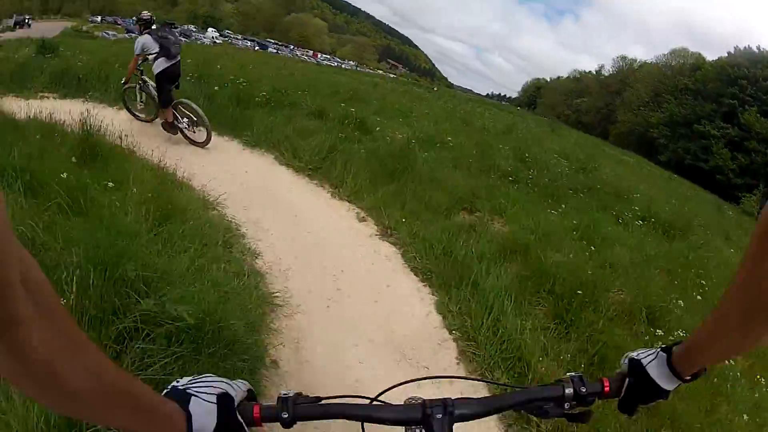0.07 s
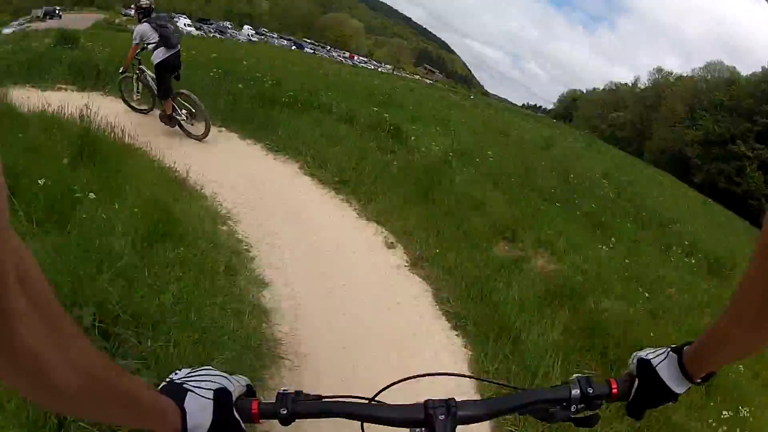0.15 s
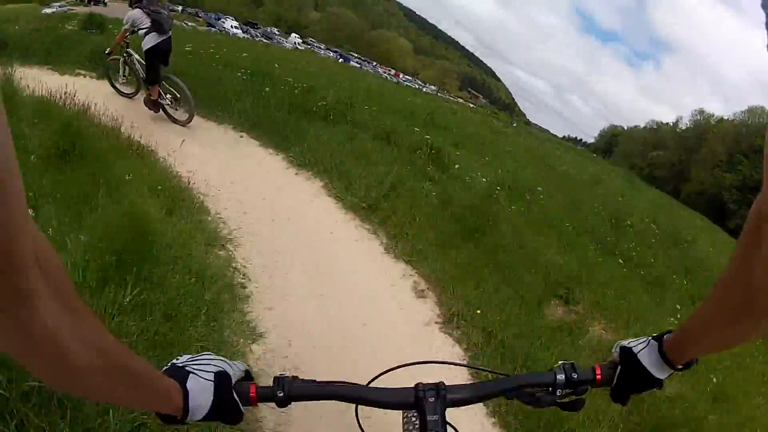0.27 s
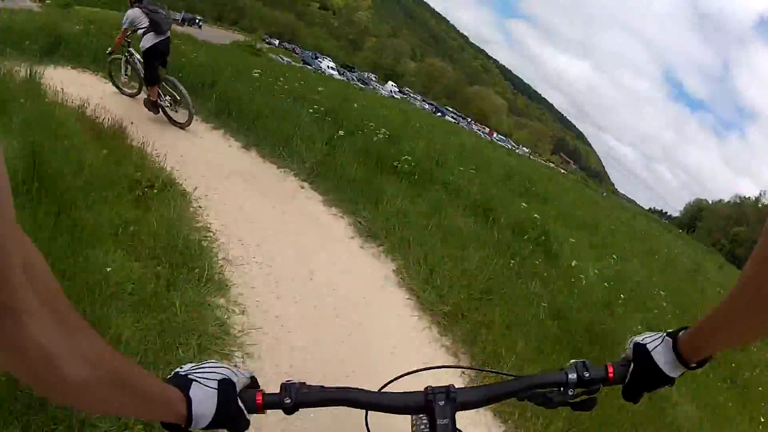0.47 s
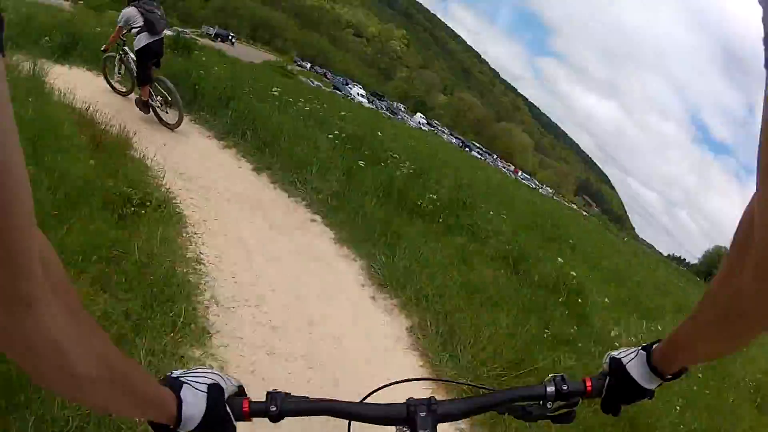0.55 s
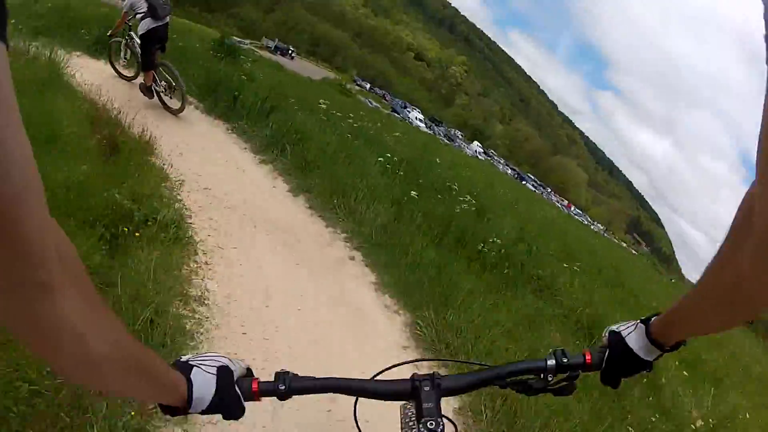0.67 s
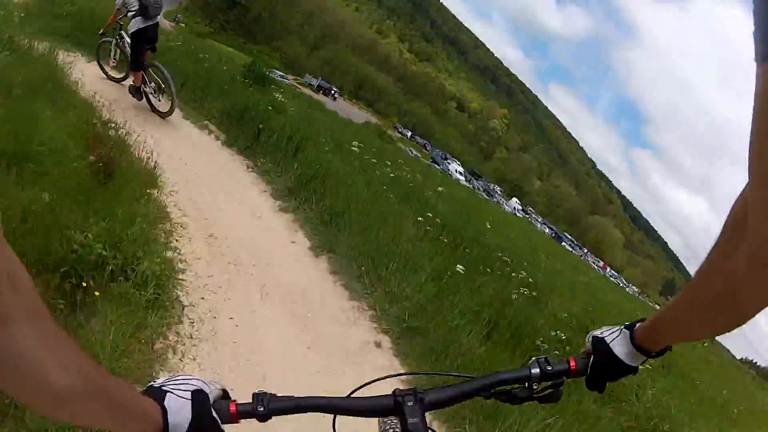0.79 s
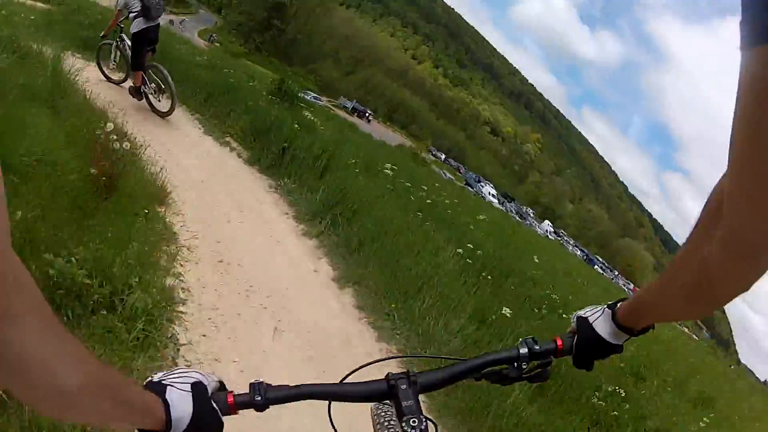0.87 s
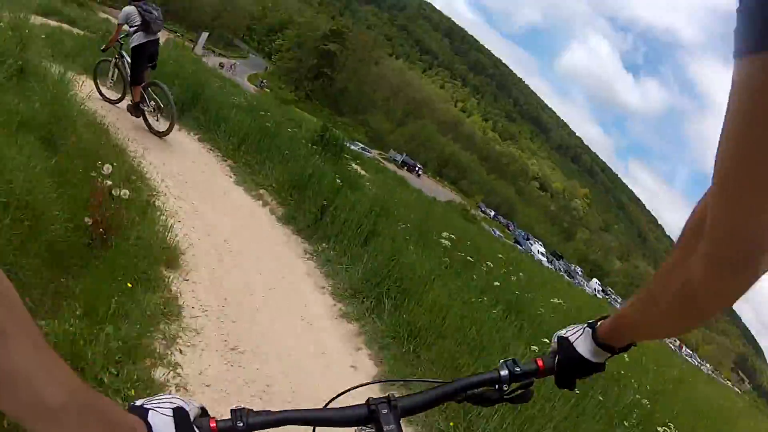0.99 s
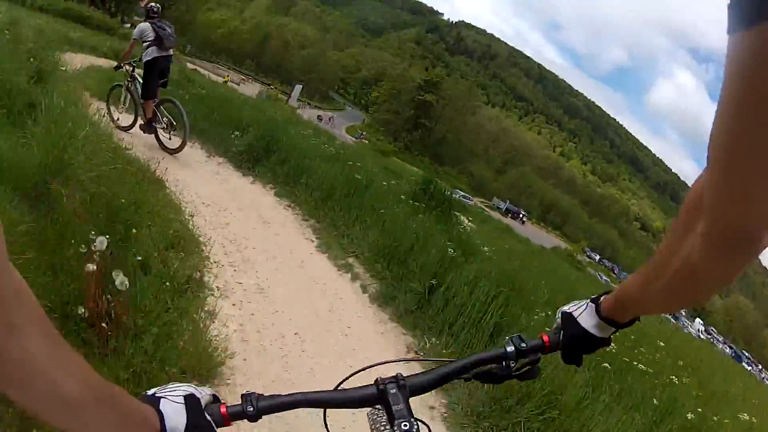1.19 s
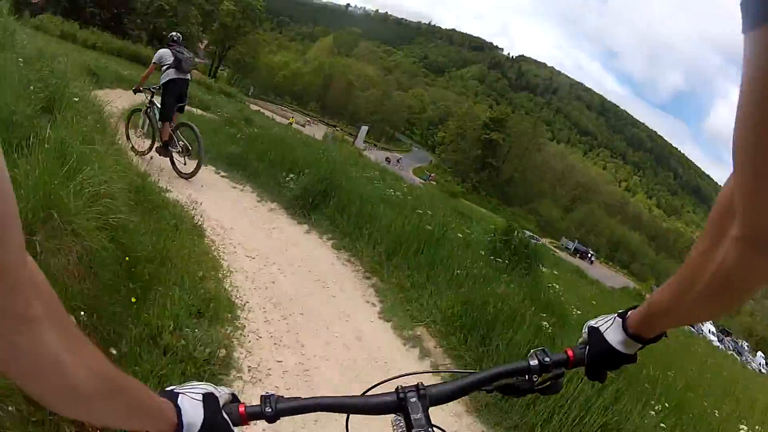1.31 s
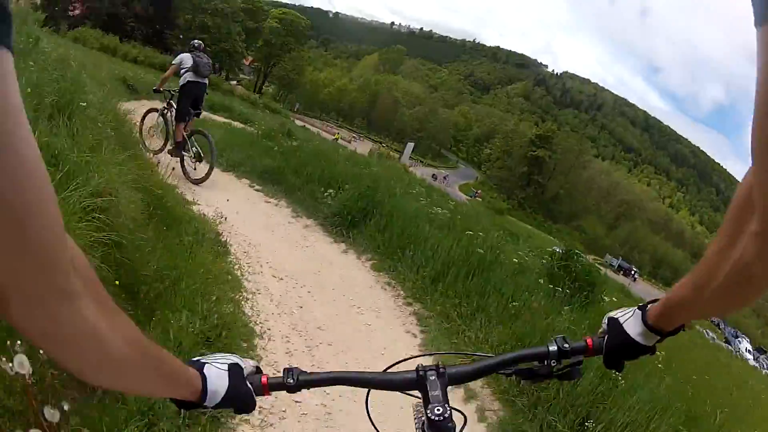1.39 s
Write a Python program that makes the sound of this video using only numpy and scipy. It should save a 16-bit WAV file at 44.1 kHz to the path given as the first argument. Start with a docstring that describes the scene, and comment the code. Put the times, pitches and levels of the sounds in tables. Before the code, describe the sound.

Heard from a microphone on the rider, a mountain bike knocks and ticks irregularly, then clacks harder as it thumps over bumps. Underneath, the tyres rush quietly on the gravel trail and wind rumbles in gusts.

```python
"""A mountain bike rattles along a gravel path, heard from a cased camera on the rider.
Loose parts rap, tick and clack: each blow strikes short resonances and leaves a faint ring in the frame.
Bumps thump through the wheels and frame. The tyres rush over grit and crunch on loose stones.
Wind rumbles on the case."""
import sys
import numpy as np
from scipy import signal
from scipy.fft import rfft, irfft, next_fast_len
from scipy.io import wavfile
from scipy.ndimage import map_coordinates

SR = 44100
rng = np.random.default_rng(int(sys.argv[2]) if len(sys.argv) > 2 else 0)


def digitize_waveform(pressure):
    """Quantize a signal to 16-bit integers and store it at the path in sys.argv[1].

    Rows of a 2-D input are taken as channels; values are limited to [-1, 1].
    """
    field = np.atleast_2d(pressure).T
    bounded = np.clip(field, -1, 1)
    quanta = np.round(bounded * 32767).astype(np.int16)
    wavfile.write(sys.argv[1], SR, quanta)


N = 63945


def amp(db):
    """Decibels to gain."""
    return 10 ** (np.asarray(db) / 20)


def unit_rms(x):
    """Scale to rms 1."""
    return x / np.sqrt(np.mean(x ** 2) + 1e-20)


def envelope(rows):
    """Gain per sample from (t/s, level/dB) rows."""
    return amp(np.interp(np.arange(N) / SR, *np.transpose(rows)))


def wobble(knots_per_s):
    """Smooth random curve, N samples."""
    knots = rng.standard_normal(int(N * knots_per_s / SR) + 4)
    return map_coordinates(knots, [np.arange(N) * knots_per_s / SR])


def filtered(x, response):
    """Apply a complex frequency response."""
    size = 2 * next_fast_len(len(x))
    return irfft(rfft(x, size) * response(np.fft.rfftfreq(size, 1 / SR)), size)[:len(x)]


def coloured(x, spectrum):
    """Minimum-phase filter through (f/Hz, level/dB) rows."""
    def response(f):
        hz, db = np.transpose(spectrum)
        gain = amp(np.interp(np.log(f + 1), np.log(hz + 1), db))
        cepstrum = irfft(np.log(gain))
        half = len(cepstrum) // 2
        cepstrum[1:half] *= 2
        cepstrum[half + 1:] = 0
        return np.exp(rfft(cepstrum))
    return filtered(x, response)


def resonance(f, hz, width_hz):
    """Damped resonance, gain 1 at its centre."""
    return 1j * f * width_hz / (hz * hz - f * f + 1j * f * width_hz)


def add(track, start_s, sound):
    """Mix a sound into the track."""
    part = track[max(0, round(start_s * SR)):][:len(sound)]
    part += sound[:len(part)]


# Rumble spectrum: f/Hz, level/dB
WIND_SPECTRUM = [(12, -9), (25, 9.5), (55, -5.5), (90, -13), (150, -22), (250, -32), (500, -48.5),
                 (1500, -65)]
# Gusts: t/s, level/dB
WIND_LEVEL = [(0, -31.5), (0.1, -46.5), (0.19, -45.5), (0.25, -29.5), (0.31, -42.5), (0.44, -35),
              (0.49, -36.5), (0.58, -35), (0.69, -34.5), (0.82, -28), (0.94, -34), (1.04, -37), (1.17, -32),
              (1.28, -37), (1.33, -47.5), (1.45, -32)]


def wind():
    """Air buffets the camera case."""
    return unit_rms(coloured(rng.standard_normal(N), WIND_SPECTRUM)) * envelope(WIND_LEVEL)


# Stone click spectrum: f/Hz, level/dB
GRIT_SPECTRUM = [(150, -33), (600, -2.5), (1000, 9), (1300, -1.5), (1750, 5), (2700, -0.5), (3700, -11.5),
                 (6000, -23.5), (8500, -22), (10200, -4.5), (12000, -33), (14000, -25), (15600, -29)]


def grit(stones_per_s, spread_db=4):
    """Stones shift under the tread and click at random; rms 1."""
    clicks = (rng.random(N) < stones_per_s / SR) * rng.choice([-1, 1], N)
    strength = amp(spread_db * np.minimum(rng.exponential(size=N), 3))
    return unit_rms(coloured(clicks * strength, GRIT_SPECTRUM))


# Tyre rush spectrum: f/Hz, level/dB
RUSH_SPECTRUM = [(100, 10), (250, 9.5), (450, 0.5), (650, 0.5), (820, -12), (1000, 2), (1300, -7),
                 (1750, 1.5), (2200, -3.5), (2600, -4), (3600, -2), (4400, -17), (6000, -21), (7500, -20),
                 (8800, -7), (10000, -26.5), (11800, -22.5), (13000, -19), (14400, -11), (15200, -17),
                 (15800, -45)]
# Rush and grit together: t/s, relative level/dB
TYRE_LEVEL = [(0, -61.5), (0.19, -60), (0.29, -54), (0.40, -56), (0.50, -56), (0.555, -53.5), (0.60, -52.5),
              (0.64, -57.5), (0.78, -53), (0.90, -54), (1.05, -54), (1.16, -56), (1.25, -53), (1.32, -59.5),
              (1.38, -54.5), (1.45, -52.5)]


def tyres(rush_db=3, flutter_db=0.9, grit_db=-0.5):
    """Tread rolls on gravel: a fluttering rush with grains of grit on top."""
    rush = unit_rms(coloured(rng.standard_normal(N), RUSH_SPECTRUM))
    rush *= amp(rush_db + flutter_db * wobble(knots_per_s=44.94))
    return envelope(TYRE_LEVEL) * (rush + amp(grit_db) * grit(stones_per_s=250))


# Wheel bumps and hollow frame thuds: centre t/s, length/s, f/Hz, envelope peak/dB
BUMPS = [(0.143, 0.044, 64.4, -38), (0.357, 0.039, 50.6, -15), (0.362, 0.055, 103, -34),
         (0.755, 0.065, 55.5, -22.5), (0.789, 0.056, 44.4, -25), (0.895, 0.11, 31.3, -22),
         (0.948, 0.016, 50.4, -19), (1.049, 0.007, 281, -40), (1.145, .04, 52, -21.5),
         (1.168, 0.0093, 113, -25.5), (1.236, 0.017, 265, -30.5), (1.319, 0.036, 62, -32.5)]


def bumps():
    """Each bump rocks the bike in a short, low tone burst."""
    out = np.zeros(N)
    for centre_s, length_s, hz, db in BUMPS:
        t = np.arange(-length_s / 2, length_s / 2, 1 / SR)
        window = np.cos(np.pi * t / length_s) ** 2
        add(out, centre_s - length_s / 2, -amp(db) * window * np.sin(2 * np.pi * hz * t))
    return out


# Contact scrape spectrum: f/Hz, level/dB
SCRAPE_SPECTRUM = [(200, -28), (1000, -22), (2300, 18), (3200, 9), (4600, -4.5), (6000, -25), (8000, 1.5),
                   (10000, 6), (12000, -3), (14200, 10.5), (15500, -14), (16500, -18)]


def blows(hits, modes, ring_partials, gain_db, scatter_db):
    """Each contact swells and dies in short resonances, with a dull shove, a scrape and a faint ring."""
    shove_hz, shove_width_hz, shove_base_db = 118, 151, -3.5
    scrape_db, scrape_t60_s, scrape_rise_s = -11.5, 0.016, 0.0012
    waver_db, waver_per_s = 2.5, 60
    out, t = np.zeros(N), np.arange(SR // 2) / SR
    pulse = signal.unit_impulse(len(t))
    shove = filtered(pulse, lambda f: resonance(f, shove_hz, shove_width_hz))
    shove = coloured(shove, [(700, -0.5), (3000, -6.5), (6000, -45.5)])
    for start_s, level_db, mids_db, treble_db, shove_db in hits:
        offset_db = scatter_db * rng.standard_normal(len(modes))
        body = np.zeros(len(t))
        for k, (hz, width_hz, db) in enumerate(modes):
            mode = filtered(pulse, lambda f: resonance(f, hz, width_hz) ** 2)  # two stages: it swells
            body += (-1) ** k * amp(db + offset_db[k]) * mode
        scrape = unit_rms(coloured(rng.standard_normal(len(t)), SCRAPE_SPECTRUM))
        scrape *= amp(scrape_db - 60 * t / scrape_t60_s) * (1 - np.exp(-t / scrape_rise_s))
        ring = sum(amp(db - 60 * t / t60_s) * np.sin(2 * np.pi * hz * t)
                   for hz, db, t60_s in ring_partials)
        ring *= amp(waver_db * wobble(waver_per_s)[:len(t)])
        hit = amp(gain_db) * (body - amp(shove_base_db + shove_db) * shove) + scrape + ring
        tone = [(1100, 0), (1800, mids_db), (2600, mids_db),
                (4200, treble_db), (7500, treble_db), (10000, 0.33 * treble_db)]
        add(out, start_s, amp(level_db) * coloured(hit, tone))
    return out


# Raps: t/s, relative level/dB, mids/dB, treble/dB, shove/dB
RAPS = [(0.2331, -3.5, 2.5, -4.5, 2), (1.1013, -19, -5.5, -0.5, -24)]
# Rap resonances: f/Hz, stage width/Hz, level/dB
RAP_MODES = [(617, 340, -14.5), (980, 334, -1.5), (1811, 269, 3), (2350, 330, -15), (3240, 540, -11),
             (4040, 190, -29), (8600, 260, -24.5), (10220, 400, -15), (13440, 300, -16)]
# Ring after a rap or tick: f/Hz, level/dB, t60/s
SHORT_RING = [(650, -28, .13), (1000, -43, .15), (11400, -50, .09), (12700, -54, .09)]


def raps():
    """One part of the bike raps sharply."""
    return blows(RAPS, RAP_MODES, SHORT_RING, gain_db=28, scatter_db=3.5)


# Ticks: t/s, relative level/dB, mids/dB, treble/dB, shove/dB
TICKS = [(0.3385, -30.5, -4, -8, -14), (0.3525, -23.5, -18, -24, -2), (0.3715, -23, 4, 0, 10.5),
         (0.4620, -39, 9.5, 7, -3), (0.4755, -33.5, -13, -7, 4), (0.5233, -14, -9.5, -20, -14),
         (0.5348, -25, -1, -19, 2), (0.5760, -23.5, -1.5, -16, -18), (0.6010, -30, 6.5, 1.5, 2),
         (0.6462, -27, -5, -21, -11), (0.6668, -30, 4.5, 3, -10), (0.6925, -29.5, -14, -16, -8),
         (0.7425, -37, 0, -14, -34), (1.1175, -28.5, 4.5, -4, 11.5), (1.3533, -18.5, -6.5, -11, 4)]
# Tick resonances: f/Hz, stage width/Hz, level/dB
TICK_MODES = [(677, 270, -9), (970, 260, -2), (1540, 600, -9.5), (1780, 286, -0.5), (2450, 127, -9.5),
              (3670, 170, -13.5), (10420, 810, -18), (12870, 700, -24)]


def ticks():
    """The bike rattles in light, dull knocks."""
    return blows(TICKS, TICK_MODES, SHORT_RING, gain_db=27.5, scatter_db=4)


# Crunches: centre t/s, length/s, level/dB
CRUNCHES = [(0.367, 0.02, -58), (0.382, 0.06, -52.5), (0.602, 0.025, -40.5), (0.669, .03, -45.5),
            (1.108, 0.038, -46.5)]


def crunches():
    """Tread grinds over loose stones: short swells of dense clicks."""
    t = np.arange(N) / SR
    swells = sum(amp(db) * np.exp(-(2 * (t - centre_s) / length_s) ** 2)
                 for centre_s, length_s, db in CRUNCHES)
    return swells * grit(stones_per_s=900)


# Clacks: t/s, relative level/dB, mids/dB, treble/dB, shove/dB
CLACKS = [(0.8003, -6, 4, -8, -1), (0.9192, -3.5, 4.5, 8.5, 3), (0.9635, -16, -5.5, -13, 3.5),
          (1.1612, -5, 1.5, 2, 2.5), (1.2298, -20, 0, -7, 6)]
# Clack resonances: f/Hz, stage width/Hz, level/dB
CLACK_MODES = [(634, 400, -8.5), (1033, 220, -2), (1486, 297, -5.5), (1725, 170, -1.5), (2000, 267, -11.5),
               (2423, 233, -5), (3185, 790, -20), (3914, 310, -24), (4415, 330, -20), (7670, 660, -26.5),
               (9620, 260, -9), (10780, 210, -16.5), (13960, 590, -27.5), (14320, 340, -13)]
# Frame ring, the close pair beats: f/Hz, level/dB, t60/s
FRAME_RING = [(1010, -38, .45), (1034, -42, .35), (1740, -47, .15), (10990, -57, .45), (13010, -57, .45)]


def clacks():
    """Another loose part strikes hard and sets the frame ringing."""
    return blows(CLACKS, CLACK_MODES, FRAME_RING, gain_db=30, scatter_db=2)


def scene():
    """Rattle, bumps, gravel and wind at one microphone."""
    return (clacks() + raps() + ticks() + bumps() + tyres() + crunches() + wind())[None]


def record(dry):
    """The loudest knocks are softly rounded off and the top of the treble is cut."""
    ceiling, knee = 0.85, 6
    rolloff_hz, limit_hz = 15600, 16500
    soft = dry / (1 + np.abs(dry / ceiling) ** knee) ** (1 / knee)
    return np.array([filtered(x, lambda f: (f < limit_hz) / (1 + (f / rolloff_hz) ** 80)) for x in soft])


dry = scene()
out = record(dry)
digitize_waveform(out)
```